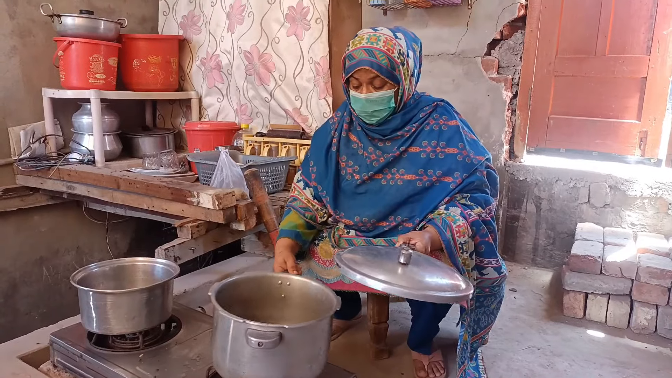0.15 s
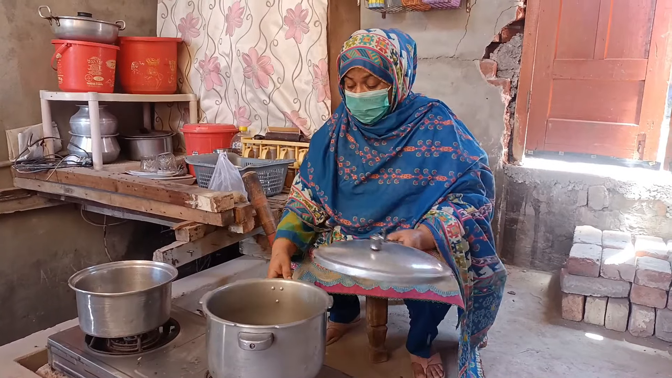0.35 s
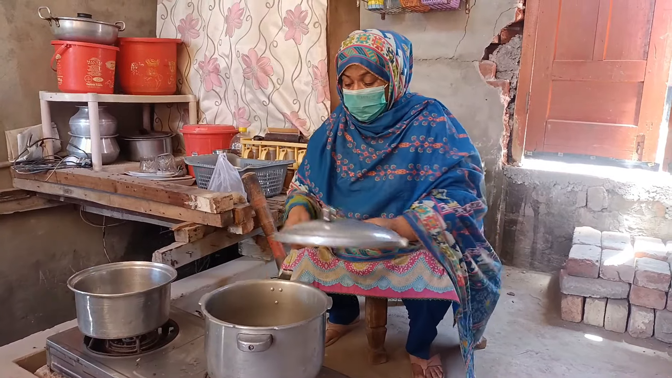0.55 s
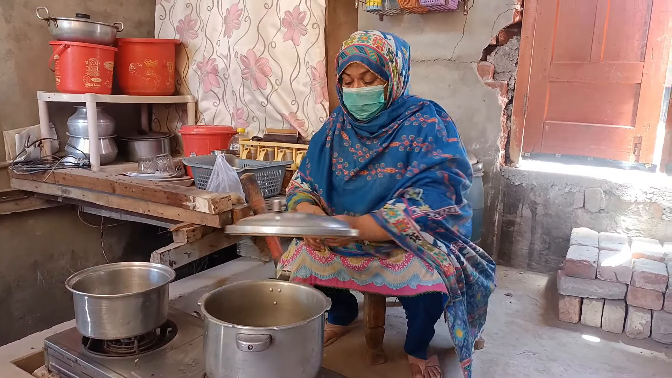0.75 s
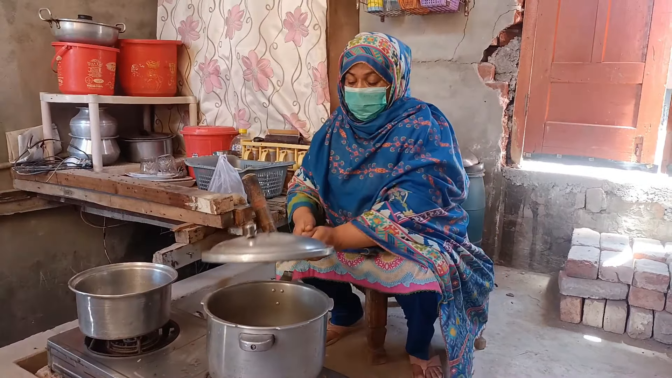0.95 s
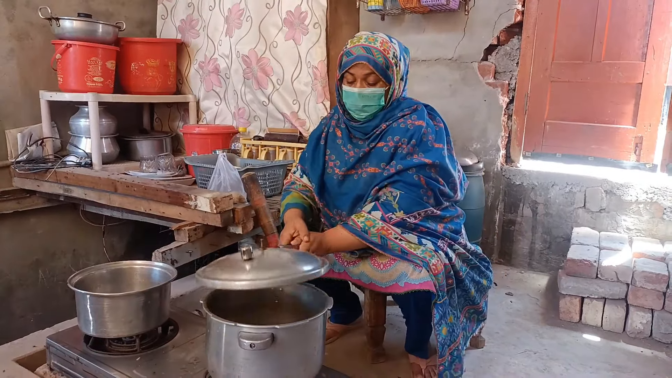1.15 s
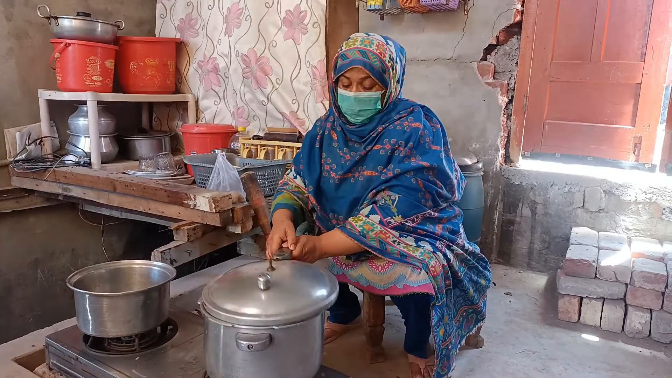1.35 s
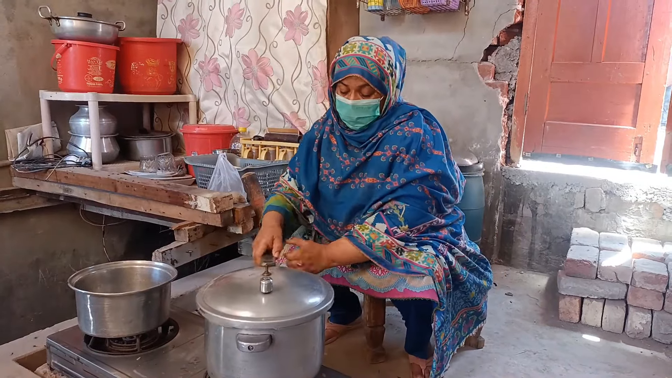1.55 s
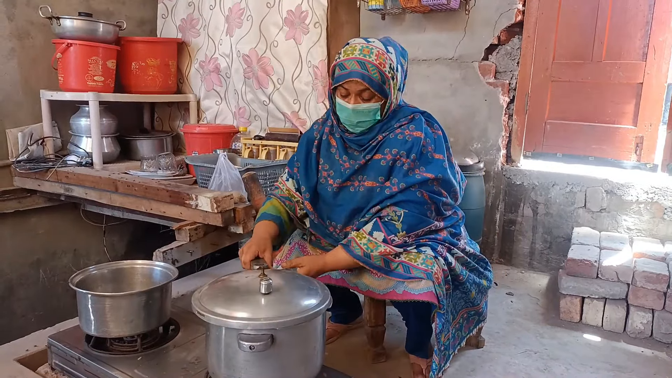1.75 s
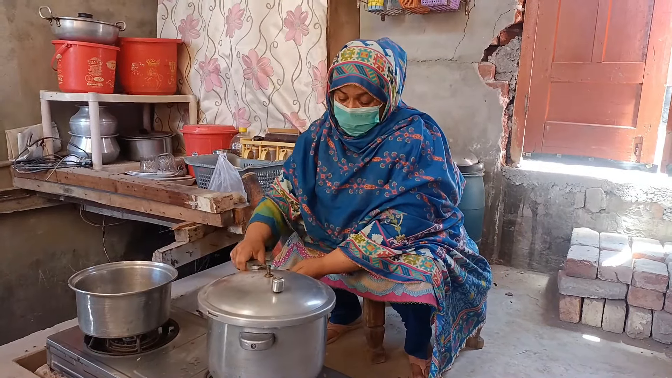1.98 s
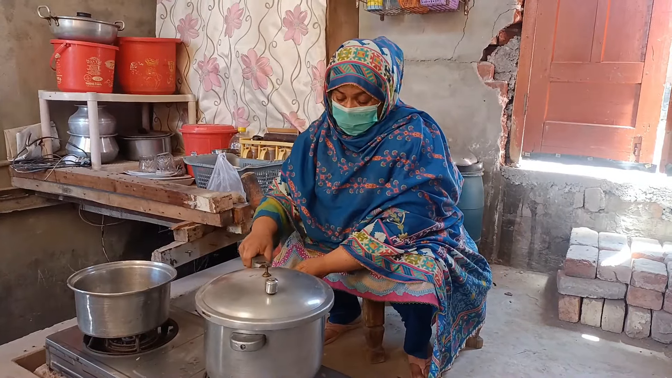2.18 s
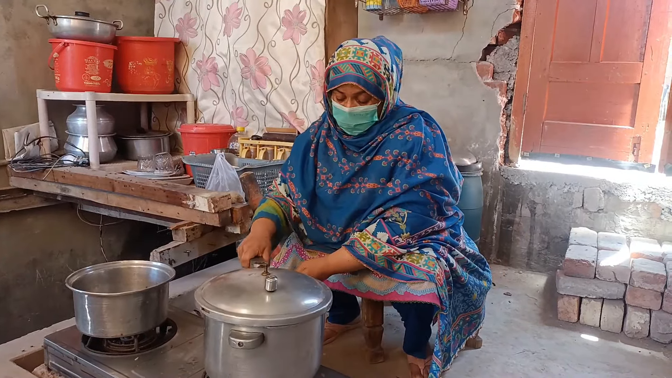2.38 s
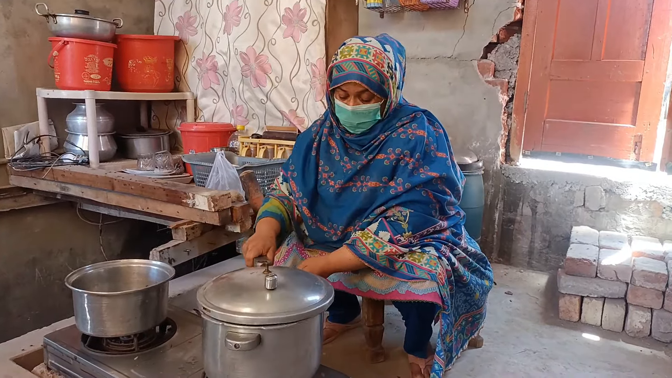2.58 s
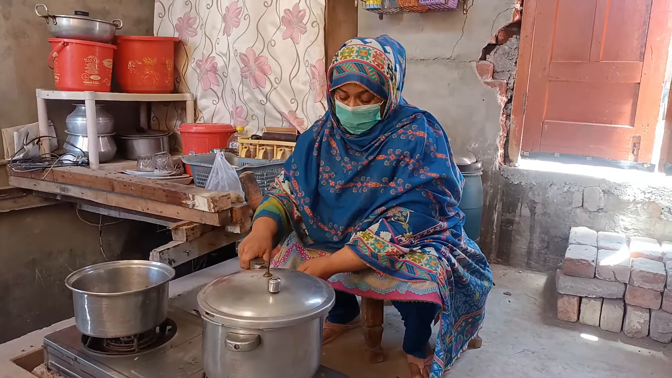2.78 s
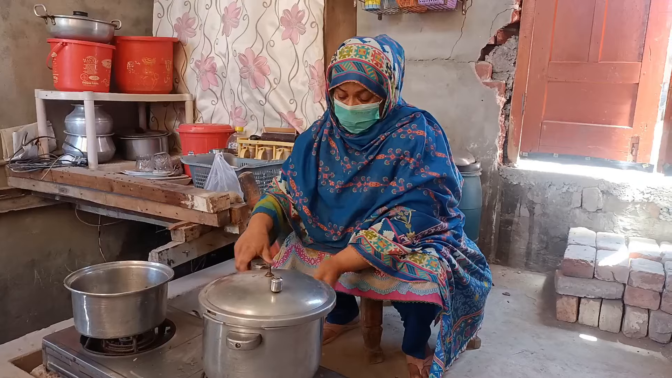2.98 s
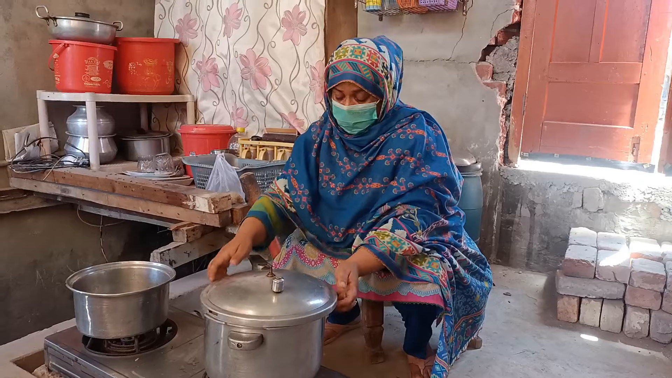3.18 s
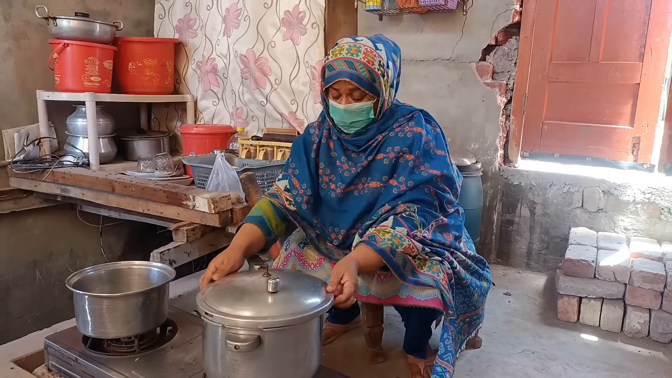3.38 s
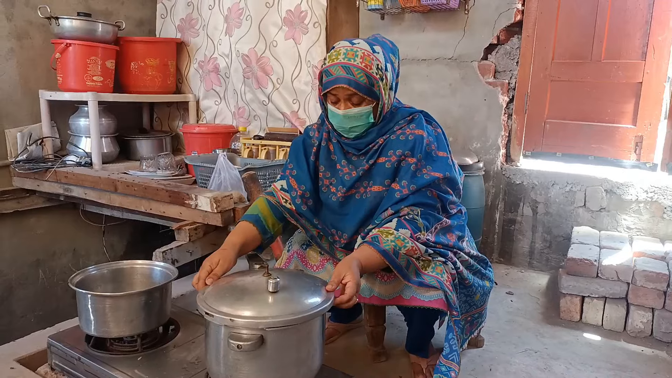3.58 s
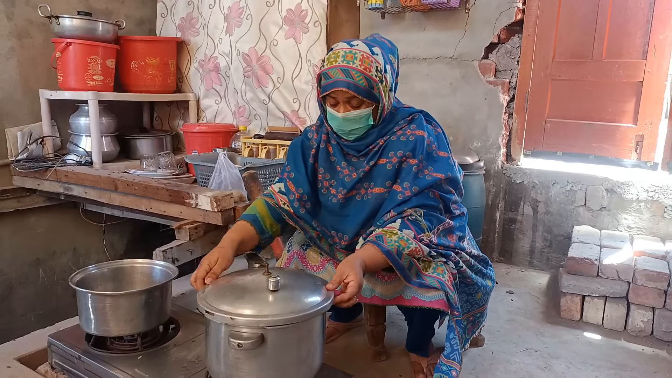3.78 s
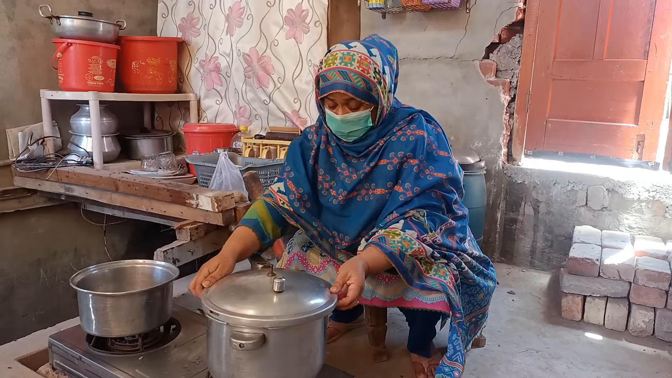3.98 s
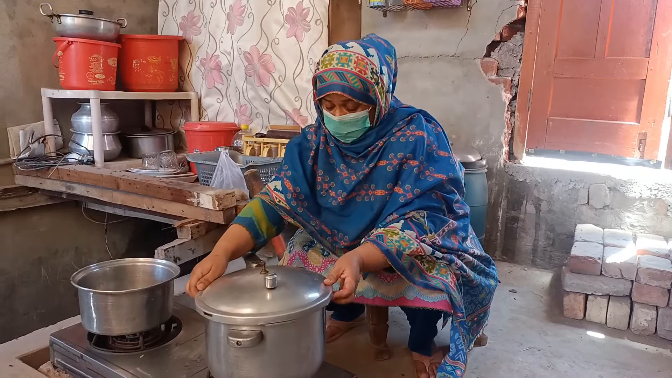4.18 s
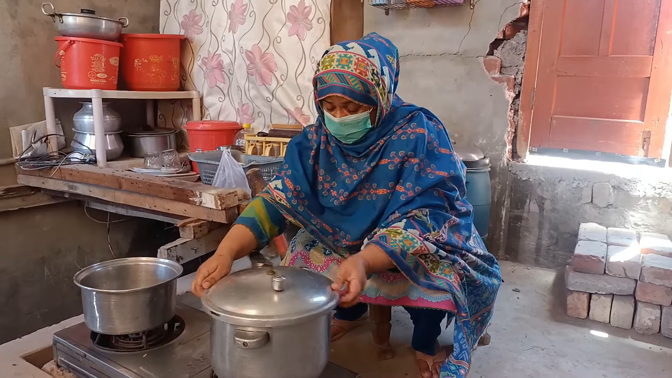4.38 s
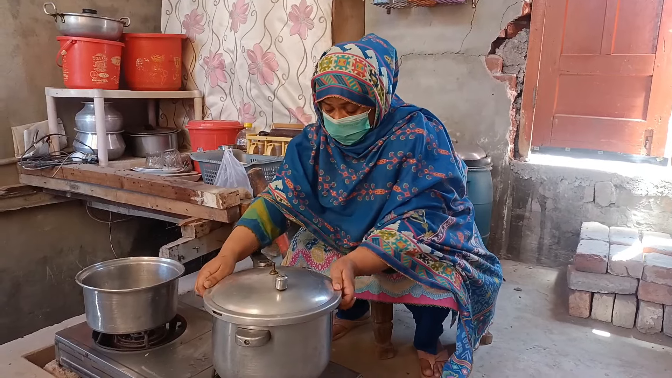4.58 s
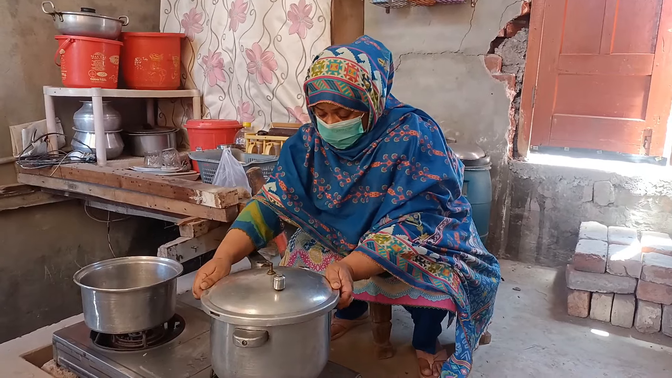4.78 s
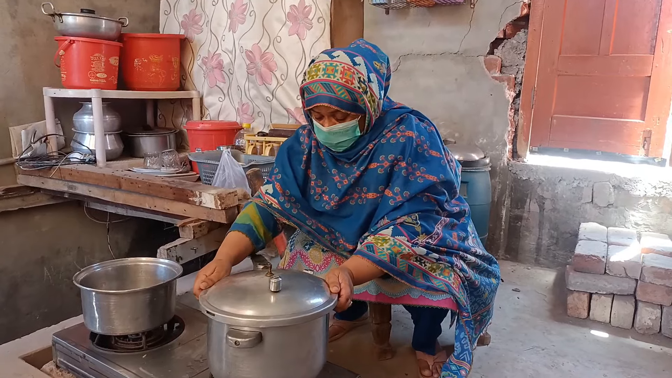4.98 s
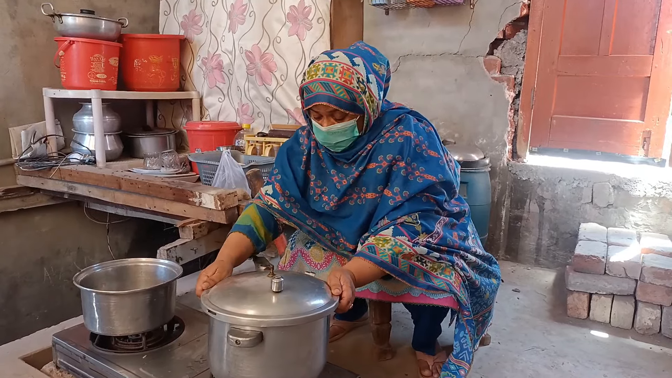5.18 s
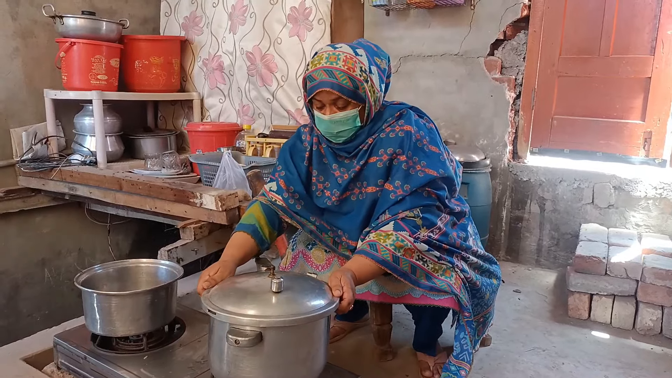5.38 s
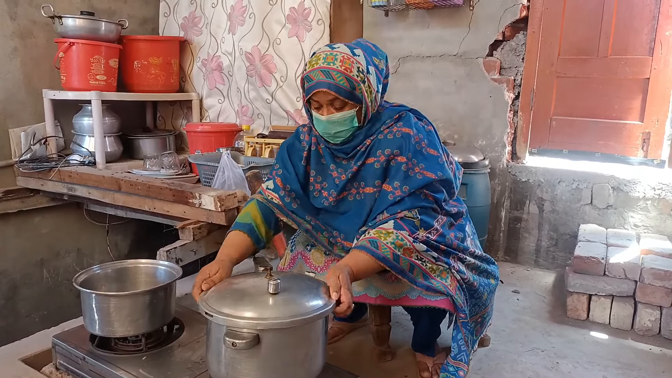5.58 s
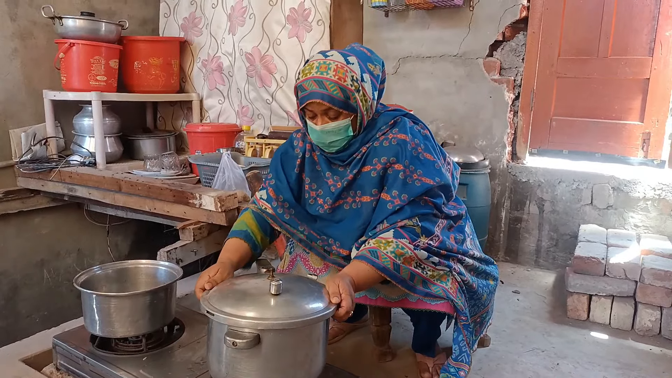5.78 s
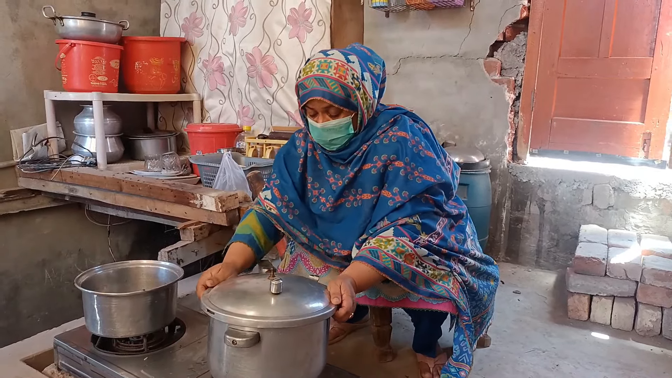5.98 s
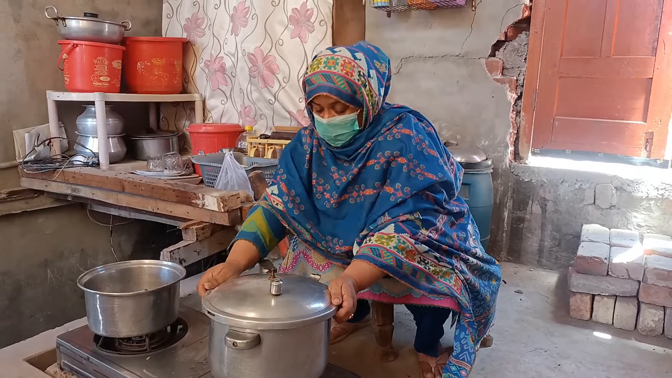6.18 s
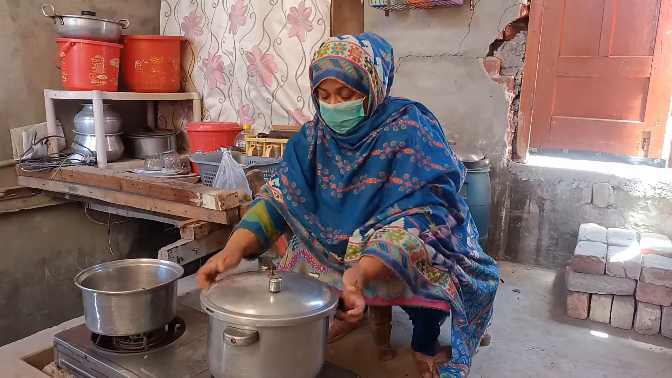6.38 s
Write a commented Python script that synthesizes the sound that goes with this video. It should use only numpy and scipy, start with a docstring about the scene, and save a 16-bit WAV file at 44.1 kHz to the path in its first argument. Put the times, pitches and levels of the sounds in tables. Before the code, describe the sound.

A metal pot lid clanks and bounces sharply onto an aluminium pot, rattles into its seat, then handles click and the pot knocks and scrapes.

```python
"""An aluminium pressure cooker is closed on a stove in a bare plastered kitchen, over a soft hiss and hum.
First the pot drags a little, then the lid clanks and bounces on its rim and a sleeve swishes past.
Between further clanks the lid rocks into its seat and is clamped, as handles click and the pot knocks.
Then the pot is shifted by its handles with dull knocks and drags, and near the end metal squeaks.
Struck parts are decaying modes plus noise bursts, friction is slip-driven noise; a limiter ducks peaks."""
import sys
import numpy as np
from scipy import signal
from scipy.fft import rfft, irfft, next_fast_len
from scipy.io import wavfile
from scipy.ndimage import uniform_filter1d, minimum_filter1d

SR = 44100
rng = np.random.default_rng(int(sys.argv[2]) if len(sys.argv) > 2 else 0)


def dump_mix(stems):
    """Bounce the given channels to the path in sys.argv[1] as a 16-bit WAV at rate SR."""
    frames = np.atleast_2d(stems).T  # one column per channel
    limited = np.clip(frames, -1, 1)  # hard clip at full scale
    pcm = np.round(limited * 32767).astype(np.int16)
    wavfile.write(sys.argv[1], SR, pcm)


N = 284224
TIME = np.arange(N) / SR
RING = int(.5 * SR)   # length of a struck sound and of the room path, samples
BUMP_HZ = 343   # centre of the pot's bump under a blow of the lid

# hard clanks of the lid, which rings less once it is held: t/s, bounce gap/s, rim ring level/dB,
# contact noise level/dB, treble tilt/dB per octave, chime level/dB, pot thud level/dB, stove bump level/dB
CLANKS = [(0.248, 0.0062, 1, -1.5, 0, -14.5, -38, -12.5), (1.197, .013, -2.5, -7, -1.5, -7.5, -20, -26),
          (1.974, .015, -13.5, -8.5, -0.5, -4, -17.5, -24.5), (2.847, .013, -9, -7.5, -.5, -1.5, -17, -29)]
# a touch and two bounces in every clank: delay/bounce gaps, then offsets to the clank's own levels:
# rim ring/dB, contact noise/dB, thud/dB
BOUNCES = [(0, -5, -4.5, 2.5), (0.999, -2.5, 1.5, -2), (2.599, -11.5, -12, -19)]
BOUNCE_TILT_DB = .7   # each bounce is brighter by so many dB an octave
# ringing of the lid's rim: f/Hz, level/dB, t60/s
RIM_MODES = [(2730, -28.5, 0.71), (2733, -2.5, 0.012), (2800, -30, .04), (3200, -32, 0.021),
             (4787, -8, 0.045), (4997, -4, 0.0073), (5150, -8.5, 0.057), (7260, -7.5, 0.013),
             (7100, -21, 0.006), (8150, -9.5, 0.2), (9700, -18.5, 0.053), (10980, -12.5, 0.036),
             (11780, -13.5, 0.15), (12800, -41, .03)]
# noise of rim on rim: f/Hz, level/dB per Hz
RIM_CRACK = [(60, -56), (150, -10), (400, -1.5), (1300, -15), (1800, -12), (2600, 7.5), (3600, -4),
             (5000, 5), (6300, -10), (7200, 4.5), (8300, -1), (9500, -18.5), (13000, -7), (15500, -22)]
# thud of the pot under the lid: f/Hz, level/dB, t60/s
THUD_MODES = [(171.5, -7, 0.2), (144.7, -10.5, 0.092), (291, -10, 0.078)]
# chime of the small steel fitting: f/Hz, level/dB, t60/s
CHIME_MODES = [(8267, 1, .24), (8197, -13, .08), (11800, -31, .06)]


def clanks():
    """Rim on rim, bouncing twice: lid rings, pot thuds and bumps the stove; a bounce chimes the fitting."""
    out = np.zeros((2, N))
    for s, gap_s, ring_db, noise_db, first_tilt_db, chime_db, thud_db, bump_db in CLANKS:
        for k, (gaps, more_ring_db, more_noise_db, more_thud_db) in enumerate(BOUNCES):
            path = kitchen(direct_db=-13.5, build_s=0.0016)
            tilt_db = first_tilt_db + k * BOUNCE_TILT_DB
            rim = from_db(ring_db + more_ring_db) * ring(RIM_MODES, path, tilt_db, pivot_hz=4700)
            contact = crack(RIM_CRACK, path, decay_s=0.0084, tilt_db=tilt_db)
            contact = from_db(noise_db + more_noise_db) * contact
            thud = from_db(thud_db + more_thud_db) * ring(THUD_MODES, path)
            add(out, s + gaps * gap_s, rim + contact + thud)
        chime = from_db(chime_db) * ring(CHIME_MODES, kitchen(direct_db=-8))
        add(out, s + gap_s, chime)
        add(out, s, from_db(bump_db) * bump(BUMP_HZ, path))
    return out


# the lid drops and rocks into its seat: t/s, level/dB, treble tilt/dB per octave
ROCKS = [(1.342, -6.5, 1.5), (1.428, -14.5, -1), (1.502, -19, -1), (1.542, -22, -2)]
# the far side of the rim lands later, softer and brighter (tilt per octave)
FAR_SIDE_S, FAR_SIDE_DB, FAR_SIDE_TILT_DB = 0.017, -9.5, 5.5
ROCK_BUMP_DB = -10.5   # the pot's bump, relative to each rock


def rattles():
    """The lid drops into its seat and rocks there, near side then far side, bumping the pot each time."""
    out, path = np.zeros((2, N)), kitchen(direct_db=3)
    for s, db, tilt_db in ROCKS:
        near_side = rattle(tilt_db) + from_db(ROCK_BUMP_DB) * bump(BUMP_HZ, path)
        far_side = rattle(tilt_db + FAR_SIDE_TILT_DB)
        add(out, s, from_db(db) * near_side)
        add(out, s + FAR_SIDE_S, from_db(db + FAR_SIDE_DB) * far_side)
    return out


# lid and pot ringing together: f/Hz, level/dB, t60/s
SEAT_MODES = [(267, -19.5, 0.12), (370, -40, 0.19), (447.5, -18.5, 0.24), (888, -12, 0.17),
              (995, -14.5, 0.062), (1314, -16.5, 0.086), (1414, -25.5, 0.23), (1893, -18, 0.19),
              (2328, -12, 0.17), (2422, -17, 0.078), (2890, -15.5, 0.22), (3654, -15, 0.11),
              (4200, -16.5, 0.079), (5620, -22, 0.11), (6260, -23, 0.076)]
# noise of the lid meeting its seat: f/Hz, level/dB per Hz
SEAT_CRACK = [(50, -49), (140, -14), (300, 13), (1600, 9.5), (2600, 19.5), (4000, 14), (5000, 11),
              (6000, 8.5), (7200, 6), (8800, 9), (10000, -7), (12500, 0), (15500, -34)]


def rattle(tilt_db, crack_db=1.0, low_cut_hz=130):
    """The lid lands in its seat: lid and pot ring together."""
    path = kitchen(direct_db=-13)
    contact = from_db(crack_db) * crack(SEAT_CRACK, path, decay_s=0.0019, tilt_db=tilt_db)
    blow = ring(SEAT_MODES, path, tilt_db, pivot_hz=2060) + contact
    return signal.sosfilt(signal.butter(2, low_cut_hz, "high", fs=SR, output="sos"), blow)


# the pot knocks on the stove, higher when the contact is harder, and jolts the lid:
# t/s, level/dB, centre f/Hz, lid rattle level/dB, lid treble tilt/dB per octave
KNOCKS = [(0.316, -19, 380, -55, 0), (1.843, -30.5, 586, -29.5, -0.5), (2.538, -26.5, 247, -28.5, -2.5),
          (2.627, -27.5, 880, -29, -2), (2.738, -40, 905, -39.5, -4.5), (3.357, -40.5, 810, -40.5, -4.5),
          (3.424, -32, 570, -35, -5.5), (3.88, -54, 700, -39, 1), (4.086, -31.5, 860, -36.5, -5.5),
          (4.463, -19.5, 483, -29, 6), (4.535, -35, 400, -28.5, 5), (4.971, -34.5, 455, -46, 15.5),
          (5.058, -28.5, 644, -52.5, -11), (5.319, -28, 615, -43.5, -4), (5.575, -39, 720, -66, -14.5),
          (5.916, -29.5, 610, -62, -12.5), (6.256, -29.5, 655, -47, -7)]
# the base falls back: softer, and lower by this ratio
REBOUND_S, REBOUND_DB, REBOUND_PITCH = .022, -7.5, 0.49


def knocks(left_db=0.1):
    """The pot bumps on the stove and falls back; the jolt rattles the lid."""
    out = np.zeros((2, N))
    for s, db, hz, lid_db, tilt_db in KNOCKS:
        path = kitchen(direct_db=-3.5)
        add(out, s, from_db(db) * bump(hz, path) + from_db(lid_db) * rattle(tilt_db))
        add(out, s + REBOUND_S, from_db(db + REBOUND_DB) * bump(hz * REBOUND_PITCH, path))
    return out * from_db(left_db * np.array([[1], [-1]]))   # left up, right down


# ringing of the pot's base: f/Hz, level/dB, t60/s
BASE_MODES = [(191, -23, 0.15), (235.2, -7.5, 0.12), (295, -37, 0.33), (365.5, -14.5, 0.27),
              (427, -12, 0.016), (501, -12.5, 0.17), (563, -5, 0.013), (752, -5.5, 0.014),
              (964, -7.5, 0.032)]
# noise of base on stove: f/Hz, level/dB per Hz
BASE_CRACK = [(40, -48), (100, -14), (200, -17), (550, 1), (950, 7), (1500, 8.5), (4000, -36), (15000, -41)]


def bump(hz, path, crack_db=-4, below=0.26, above=1.6):
    """One contact of the base with the stove; it favours the modes around its own centre."""
    body = ring(BASE_MODES, path) + from_db(crack_db) * crack(BASE_CRACK, path, decay_s=0.0057)
    contact = signal.butter(2, [hz * below, hz * above], "band", fs=SR, output="sos")
    return burst_one(signal.sosfilt(contact, body))


# the sharpest clicks of the handles: t/s, level/dB, f/Hz
CLICKS = [(1.129, -43.5, 4440), (2.785, -46.5, 4530), (3.423, -39.5, 4110), (4.174, -43, 4720),
          (4.773, -41.5, 4410), (5.476, -51, 4300)]


def handles(per_s=42, faintest_db=-56.5, spread_db=6, low_hz=3600, high_hz=6600):
    """The handles click in the grip, with fainter ticks of ten pitches strewn at random in between."""
    out, path = np.zeros((2, N)), kitchen(direct_db=-2)
    for s, db, hz in CLICKS:
        add(out, s, from_db(db) * click(hz, path))
    ticks = [click(hz, path) for hz in np.geomspace(low_hz, high_hz, 10)]
    slot_s = .01   # at most one tick in each slot
    slots = np.arange(2, TIME[-1] - slot_s, slot_s)   # ticks start at 2 s
    for s, (chance, size, which, late) in zip(slots, rng.random((len(slots), 4))):
        if chance < per_s * slot_s:
            tick = ticks[int(which * len(ticks))]
            add(out, s + late * slot_s, from_db(faintest_db + spread_db * size) * tick)
    return out


# ringing of a handle: multiple of the click's pitch, level/dB, t60/s
HANDLE_MODES = [(0.528, -4.5, 0.044), (1.002, 9, 0.0081), (1.38, 0.5, .008)]
# contact noise of a handle: f/Hz, level/dB per Hz
HANDLE_CRACK = [(500, 19), (3000, -59), (4500, 21), (7000, -16), (15000, -4)]


def click(hz, path):
    """One small, well damped contact of a handle."""
    modes = [(hz * multiple, db, t60) for multiple, db, t60 in HANDLE_MODES]
    return ring(modes, path) + from_db(-4) * crack(HANDLE_CRACK, path, decay_s=.004)


# pushes that shift the pot: t/s, length/s, drag level/dB, base groan level/dB, stove rumble level/dB
PUSHES = [(.02, 0.14, -43, -35, -75), (.68, 0.22, -40.5, -62, -60), (2.56, 0.24, -38, -52, -67),
          (3.47, 0.4, -40, -52.5, -65), (4.48, 0.044, -25.5, -26.5, -55), (5.2, 0.051, -31.5, -32.5, -34),
          (5.97, 0.12, -23.5, -45, -44)]
PUSH_RISE_S, PUSH_FALL_DB_PER_S = 0.01, 149
GRIP_FROM_S, GRIP_DB = 1.2, -43.5   # once in hand, the pot never rests quite still
# friction noise of the dragging base: f/Hz, level/dB per Hz
SLIDING = [(40, -59), (100, 1.5), (180, 2), (330, 6), (490, 9), (680, 2.5), (1000, -7.5), (1600, -12.5),
           (5000, -50), (15000, -55)]
# groan of the base: f/Hz, level/dB per Hz
GROANING = [(200, -44), (420, -38), (465, 0.5), (495, -11), (550, -14), (900, -40), (3000, -80)]
# rumble of the stove: f/Hz, level/dB per Hz
RUMBLING = [(30, -25), (70, -5), (100, 12), (135, -17), (200, -24), (500, -45), (3000, -70)]


def slide():
    """The base drags over the stove in small slips and groans; a hard push sets the stove rumbling."""
    push, groan, rumble = strokes(PUSHES, PUSH_RISE_S, PUSH_FALL_DB_PER_S)
    grip = from_db(GRIP_DB) * (TIME > GRIP_FROM_S)
    drag = stick_slip(slips_per_s=190, slip_db=4.5, decay_s=0.0043) * noise(SLIDING, N)
    drag = np.hypot(push, grip) * rms_one(heard(drag, kitchen(direct_db=1)))
    return drag + groan * noise(GROANING, N) + rumble * noise(RUMBLING, N)


# the rim sticks and slips: t/s, length/s, squeal level/dB, scrape level/dB
SQUEAKS = [(.03, 0.079, -86, -35.5), (6.078, 0.021, -28.5, -23), (6.1, 0.036, -33.5, -27.5),
           (6.18, 0.066, -40.5, -41)]
SQUEAK_RISE_S, SQUEAK_FALL_DB_PER_S = 0.021, 380
# gritty scrape of metal on metal: f/Hz, level/dB per Hz
SCRAPING = [(400, -40), (1300, 5.5), (1700, 0), (2400, 15), (3200, 5.5), (4600, 8.5), (6000, -21),
            (15000, -48)]


def squeak(slip_hz=2358, waver=0.0015, third_db=-4, room_db=-7):
    """Metal turns on metal: a gritty scrape, and a squeal on harmonics two and three of the slip rate."""
    squeal, scrape = strokes(SQUEAKS, SQUEAK_RISE_S, SQUEAK_FALL_DB_PER_S)
    wander = rms_one(uniform_filter1d(rng.standard_normal(N), size=400))
    phase = 2 * np.pi * np.cumsum(slip_hz * (1 + waver * wander)) / SR
    tone = squeal * (np.sin(2 * phase) + from_db(third_db) * np.sin(3 * phase))
    grit = scrape * stick_slip(slips_per_s=140, slip_db=10, decay_s=0.0015) * noise(SCRAPING, N)
    return tone + heard(grit + from_db(room_db) * tone, kitchen(direct_db=-6))


# a sleeve swishes past: t/s, length/s, level/dB (a ceiling: the swell is cut short)
SWISHES = [(.85, 0.044, -30), (1.05, 0.066, -32)]
SWISH_RISE_S, SWISH_FALL_DB_PER_S = 0.098, 137
# swish of cloth: f/Hz, level/dB per Hz
CLOTH = [(300, -5), (2000, 0), (4000, 6.5), (9000, 3), (14000, -3), (16000, -6)]
# hiss under it all: f/Hz, level/dB per Hz
HISS = [(20, -24), (35, -1), (52, 23), (80, 4), (170, 21.5), (500, 6.5), (1000, 4.5), (1500, -3),
        (2400, 11.5), (4500, 10), (6500, 9.5), (8800, 7), (10000, 1.5), (15500, 3.5)]
HISS_DB, HISS_WAVER_DB, HISS_WAVER_S = -36, 2.43, .15   # the hiss wavers slowly
DIP_AT_S, DIP_WIDTH_S, DIP_DB = 0.62, 0.17, -5.5   # the hiss dips briefly
HUM_HZ, HUM_DB = 50, -55


def background():
    """A hiss that wavers and dips once, a low mains hum and the swish of a sleeve."""
    steps = np.arange(0, TIME[-1] + HISS_WAVER_S, HISS_WAVER_S)
    waver_db = HISS_WAVER_DB * np.interp(TIME, steps, rng.standard_normal(len(steps)))
    dip_db = DIP_DB * np.exp(-((TIME - DIP_AT_S) / DIP_WIDTH_S) ** 2)
    hiss = from_db(HISS_DB + waver_db + dip_db) * two_ports(noise(HISS, N, channels=2), apart_hz=960)
    swish = strokes(SWISHES, SWISH_RISE_S, SWISH_FALL_DB_PER_S)
    sleeve = swish * two_ports(noise(CLOTH, N, channels=2))
    hum = from_db(HUM_DB) * np.sin(2 * np.pi * HUM_HZ * TIME)
    return hiss + sleeve + hum


# the kitchen's decay: f/Hz, t60/s
ROOM_T60 = [(100, 0.59), (400, 0.52), (1500, 0.45), (3000, 0.37), (6000, 0.35), (9000, 0.23), (15000, 0.19)]
PORT_LAG_S = .0003   # the left microphone hears the pot later


def kitchen(direct_db=-9, build_s=0.0013, early=0.74, early_s=0.049):
    """Pot to microphones: direct sound, strong reflections from nearby walls, a tail dying by band."""
    t, hz = np.arange(RING) / SR, np.fft.rfftfreq(RING, 1 / SR)
    white = np.exp(2j * np.pi * rng.random((2, len(hz))))
    edges_hz = [1, 200, 700, 2000, 4000, 7000, 10000, SR / 2]
    tail = 0
    for low, high in zip(edges_hz, edges_hz[1:]):
        band = irfft(white * (hz >= low) * (hz < high), RING)
        tail = tail + band * np.exp(-np.log(1000) * t / at_hz(ROOM_T60, (low + high) / 2))
    swell = (1 - np.exp(-t / build_s)) * (1 + early * np.exp(-t / early_s))
    path = two_ports(tail * swell) / np.sqrt(RING)
    path[[0, 1], [round(PORT_LAG_S * SR), 0]] += from_db(direct_db)
    return path


def heard(x, path):
    """A mono sound carried along a room path."""
    return signal.fftconvolve(np.atleast_2d(x), path, axes=1)[:, :x.shape[-1]]


def two_ports(pair, apart_hz=900):
    """Diffuse sound at two close microphones: alike in the bass, unrelated in the treble; rms 1."""
    mid, side = pair
    side = signal.sosfilt(signal.butter(1, apart_hz, "high", fs=SR, output="sos"), side)
    bass = signal.sosfilt(signal.butter(1, apart_hz, fs=SR, output="sos"), mid)
    mid = mid + (np.sqrt(2) - 1) * bass   # makes up for the missing side
    return rms_one(np.array([mid + side, mid - side]))


def ring(modes, path, tilt_db=0, pivot_hz=3000):
    """Struck modes in the room, each a decaying cosine, tilted in dB per octave about the pivot."""
    t, out = np.arange(RING) / SR, 0
    for hz, db, t60 in modes:
        mode = rng.choice([-1, 1]) * np.cos(2 * np.pi * hz * t) * np.exp(-np.log(1000) * t / t60)
        mode = mode * (1 - np.exp(-t * hz))   # a mode radiates little below its own frequency
        out = out + from_db(db + tilt_db * np.log2(hz / pivot_hz)) * burst_one(heard(mode, path))
    return out


def crack(spectrum, path, decay_s, tilt_db=0):
    """The many short-lived modes of a contact, merged into a burst of noise."""
    burst = noise(spectrum, RING, tilt_db=tilt_db) * np.exp(-np.arange(RING) / SR / decay_s)
    return burst_one(heard(burst, path))


def stick_slip(slips_per_s, slip_db, decay_s):
    """Friction force: uneven slips of bounded size, each dying quickly; rms 1."""
    size = from_db(slip_db * np.clip(rng.standard_normal(N), -2, 2))
    slips = (rng.random(N) < slips_per_s / SR) * size
    return rms_one(signal.lfilter([1], [1, -np.exp(-1 / (decay_s * SR))], slips + 1e-18))


def strokes(rows, rise_s, fall_db_per_s):
    """Each stroke swells toward its level and, past its length, dies away; one curve per dB column."""
    out = 0
    for start, length, *levels_db in rows:
        rise = np.clip((TIME - start) / rise_s, 0, 1)
        fall = from_db(-fall_db_per_s * np.maximum(TIME - start - length, 0))
        out = out + np.outer(from_db(levels_db), rise * fall)
    return out


def noise(spectrum, size, channels=1, tilt_db=0):
    """Noise with a given spectrum, tilted by so many dB an octave; rms 1."""
    fast = next_fast_len(size)
    hz = np.fft.rfftfreq(fast, 1 / SR)
    gain = from_db(at_hz(spectrum, hz) + tilt_db * np.log2(hz + 1))
    white = rng.standard_normal((channels, fast))
    return rms_one(irfft(rfft(white) * gain, fast)[:, :size])


def at_hz(points, hz):
    """Read a table on a log-frequency axis."""
    f, value = np.transpose(points)
    return np.interp(np.log(np.maximum(hz, 1)), np.log(f), value)


def from_db(db):
    """Decibels to gain."""
    return 10 ** (np.asarray(db) / 20)


def rms_one(x):
    """Scale to rms 1."""
    return x / np.sqrt(np.mean(x ** 2) + 1e-20)


def burst_one(x):
    """Scale a dying sound to the energy of rms 1 held for a sixteenth of a second."""
    return rms_one(x) * np.sqrt((SR // 16) / x.shape[-1])


def add(out, s, sound):
    """Mix a sound in at a given time."""
    start = max(round(s * SR), 0)
    out[:, start:start + sound.shape[1]] += sound[:, :out.shape[1] - start]


def scene():
    """Lid, pot and handles in the kitchen."""
    return clanks() + rattles() + knocks() + handles() + slide() + squeak() + background()


def record(dry, threshold_db=4.0, release_db_per_s=70, ceiling=1.2, cutoff_hz=15300):
    """A look-ahead limiter ducks the peaks and recovers; what is left is rounded and the top is cut."""
    peak = -minimum_filter1d(-np.abs(dry).max(axis=0), size=128)
    excess_db = np.maximum(20 * np.log10(peak + 1e-9) - threshold_db, 0)
    recovery_db = release_db_per_s * TIME
    duck_db = np.maximum.accumulate(excess_db + recovery_db) - recovery_db
    held = dry * from_db(-uniform_filter1d(duck_db, size=128))
    rounded = held / (1 + (held / ceiling) ** 8) ** (1 / 8)
    return signal.sosfilt(signal.ellip(10, .1, 80, cutoff_hz, fs=SR, output="sos"), rounded)


dry = scene()
out = record(dry)
dump_mix(out)
```